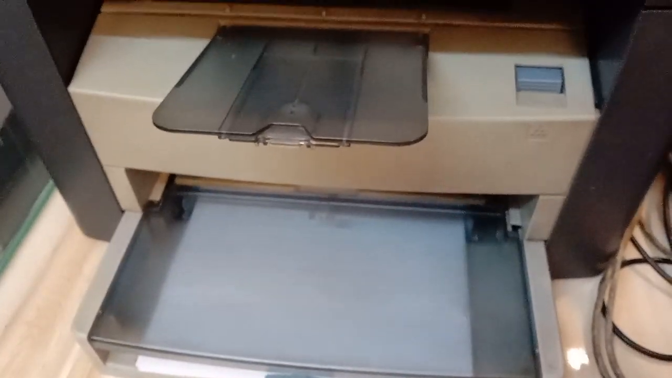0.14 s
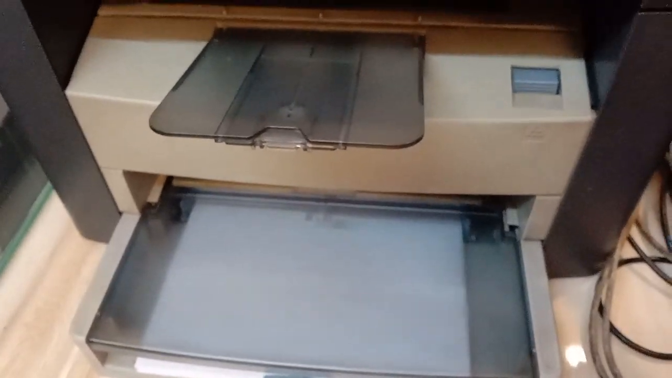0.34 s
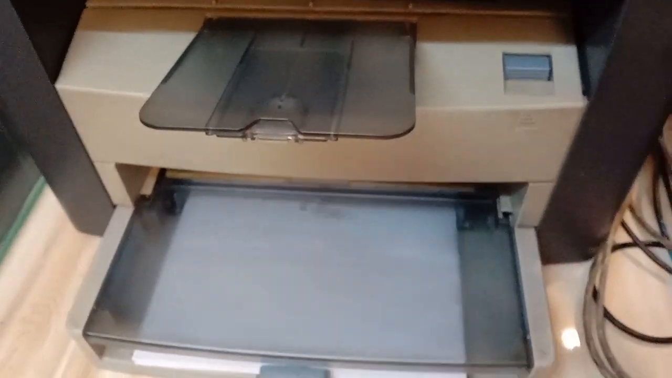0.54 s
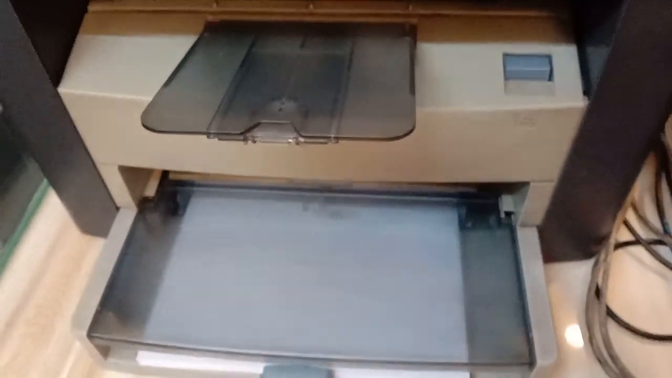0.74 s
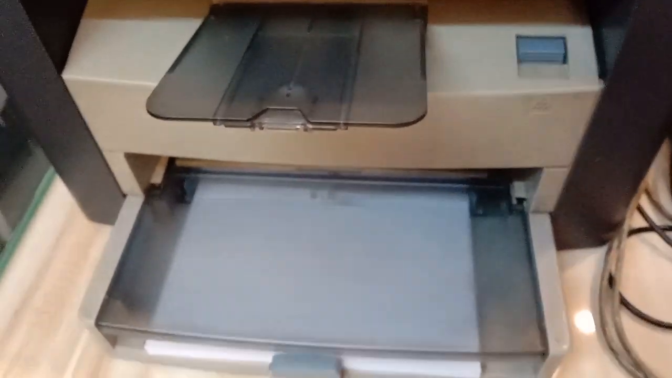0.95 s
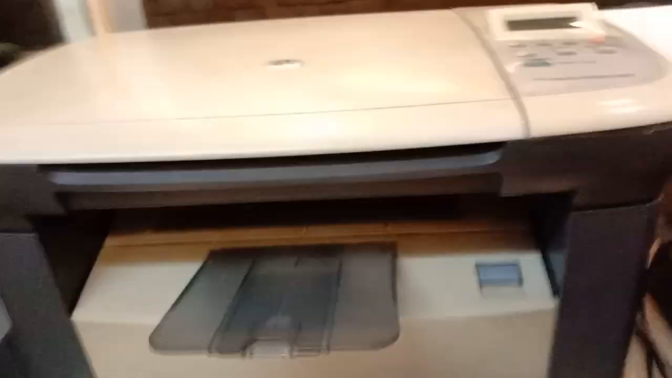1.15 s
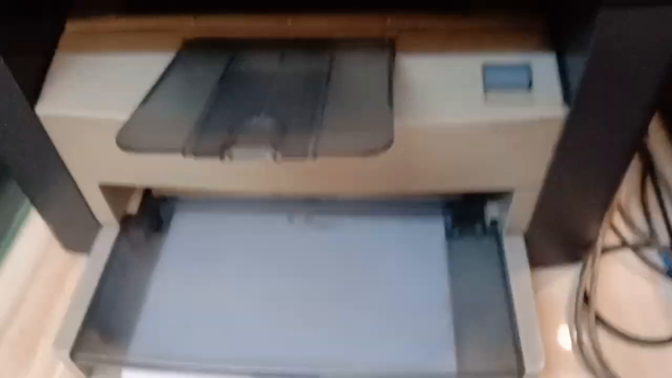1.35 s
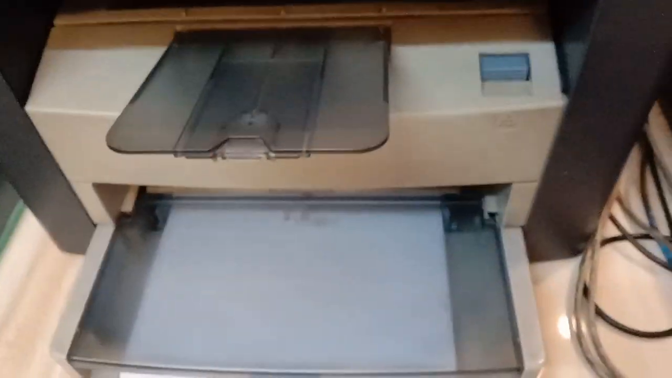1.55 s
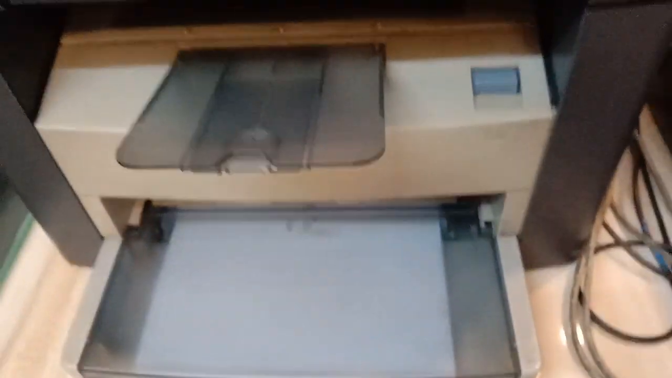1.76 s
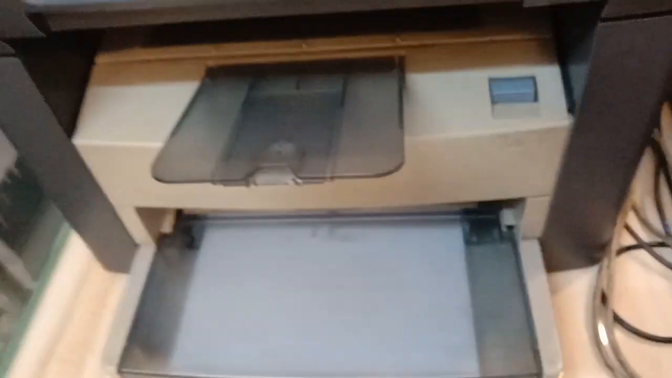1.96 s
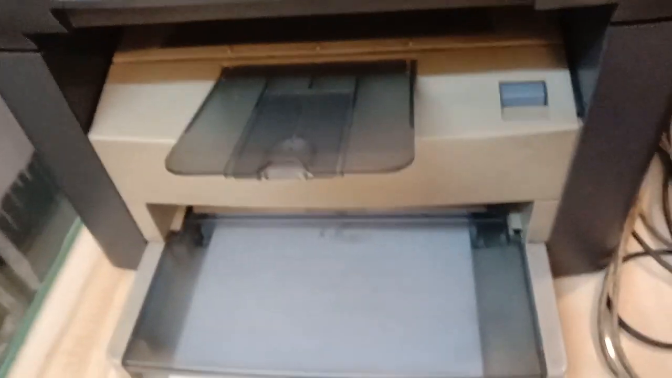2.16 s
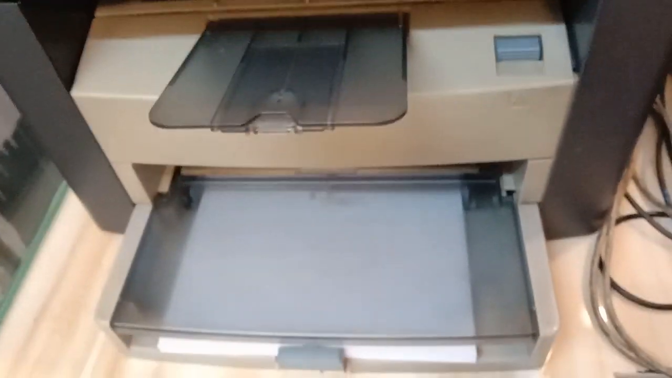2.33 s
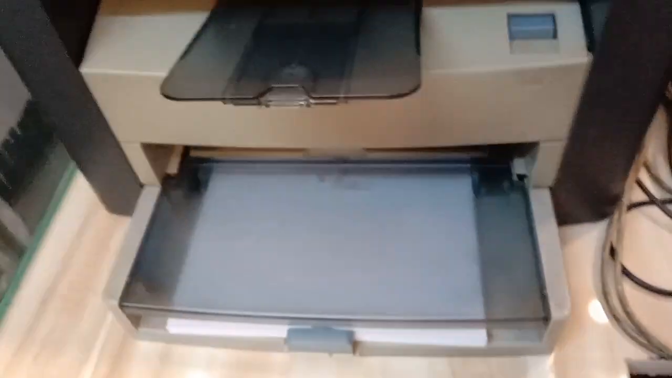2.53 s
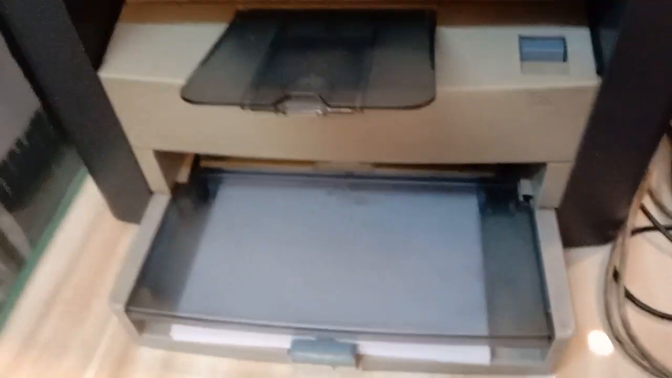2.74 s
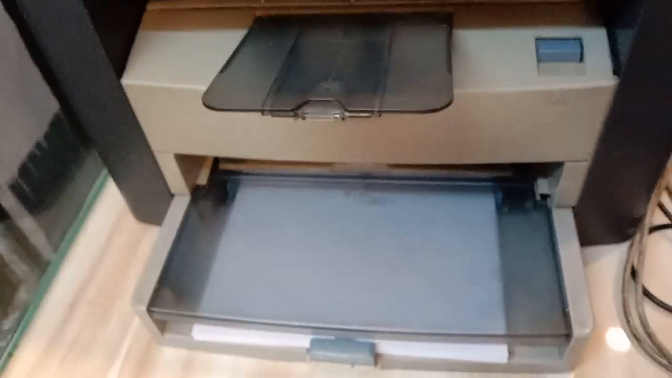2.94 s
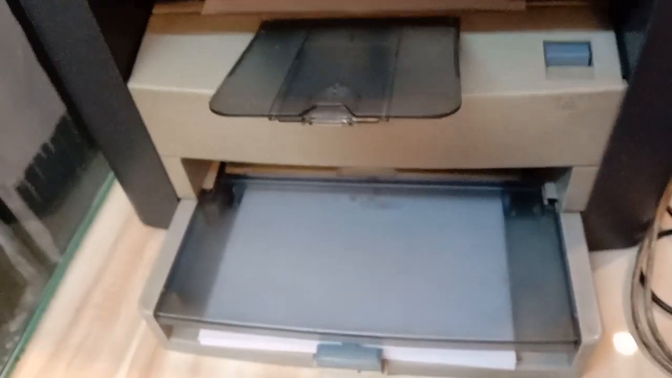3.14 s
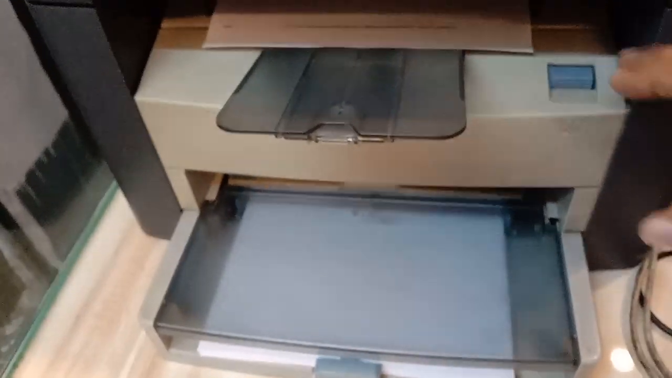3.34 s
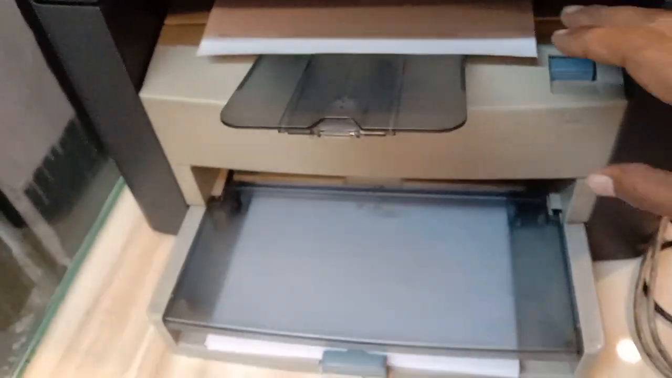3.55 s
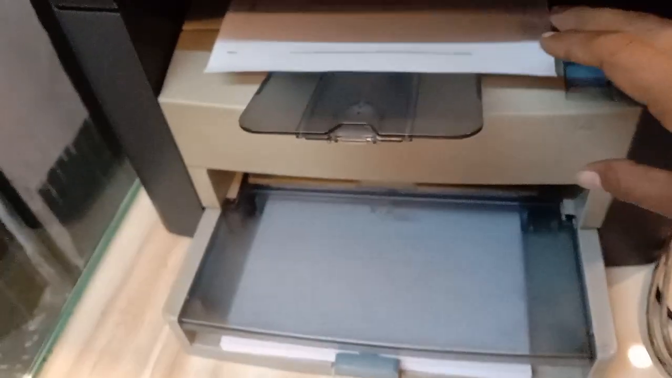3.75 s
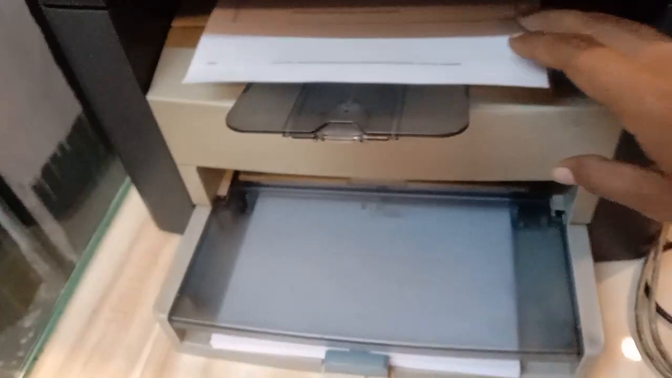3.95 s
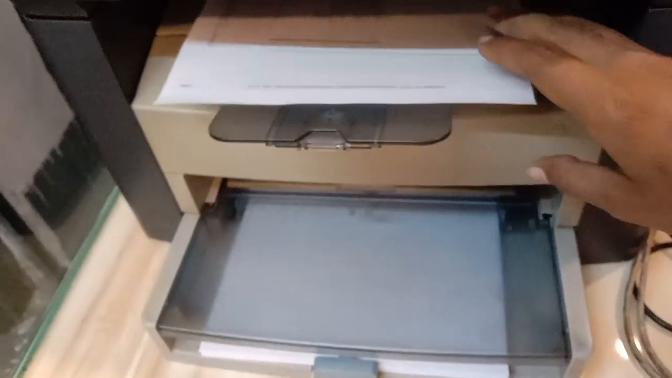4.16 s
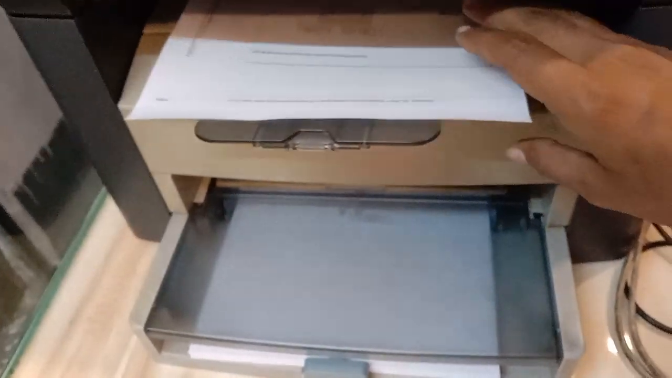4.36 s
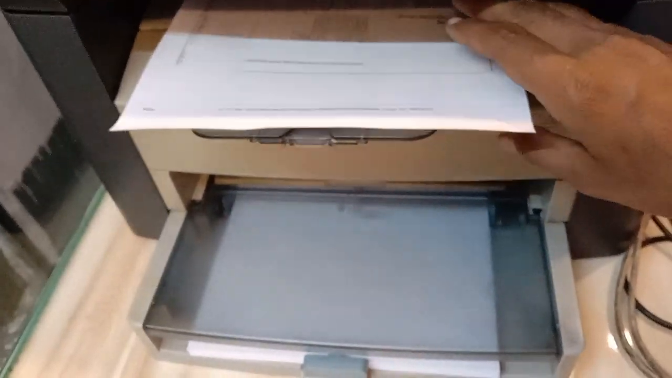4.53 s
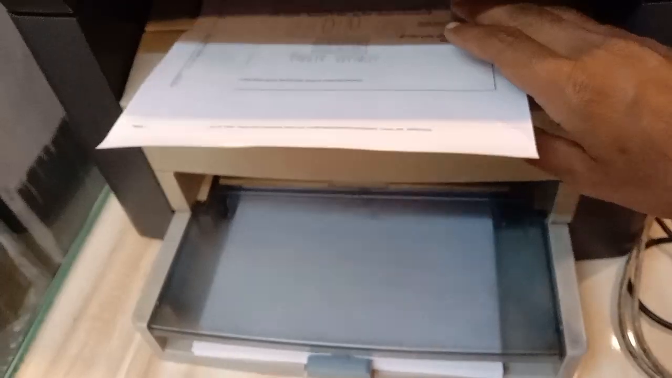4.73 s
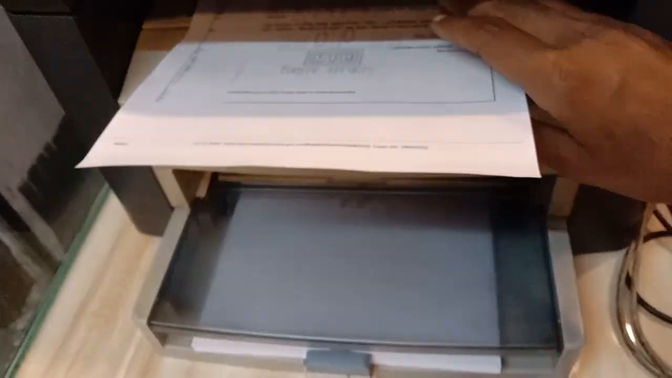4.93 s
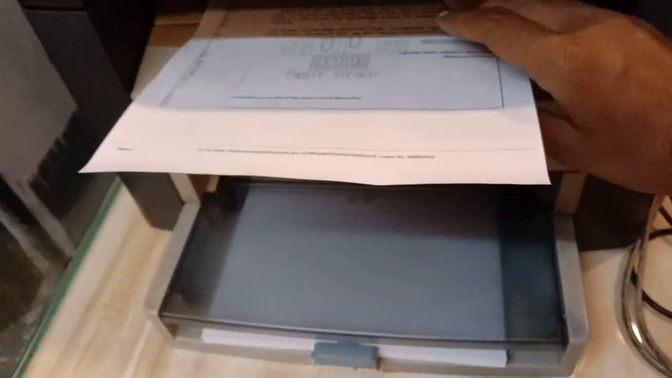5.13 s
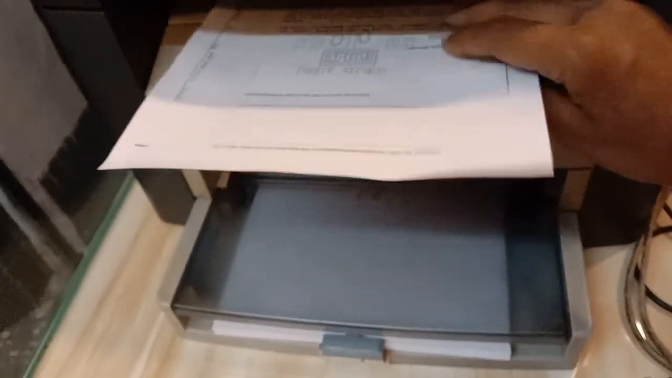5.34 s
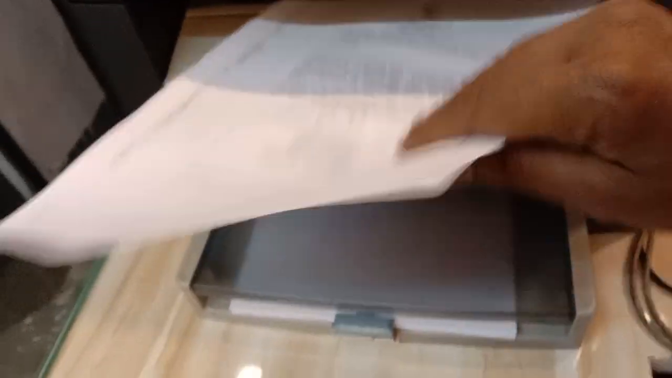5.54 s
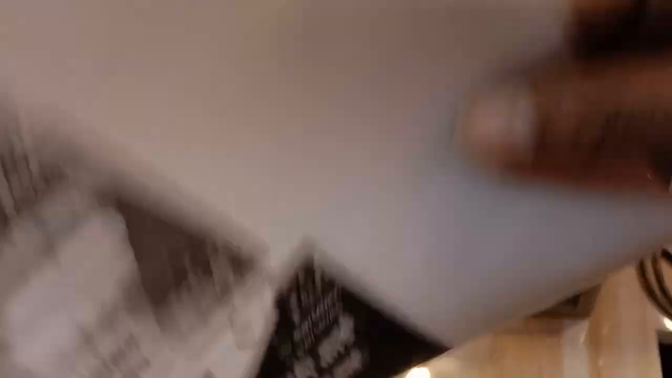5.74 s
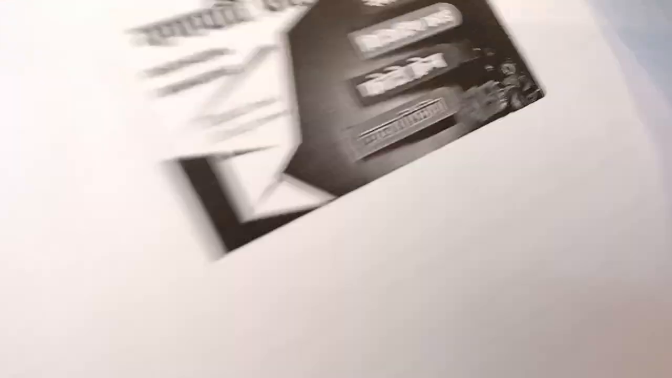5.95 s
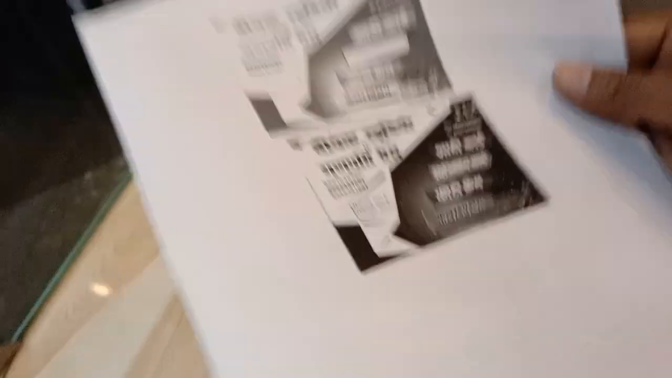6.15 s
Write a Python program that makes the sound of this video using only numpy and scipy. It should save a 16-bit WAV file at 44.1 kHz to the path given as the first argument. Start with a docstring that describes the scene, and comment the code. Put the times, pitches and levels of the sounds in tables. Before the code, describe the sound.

A desktop laser printer runs with a steady hum, a low rumble and a higher gear whine. Early on, two hollow plastic knocks and a sharp latch snap stand out. Paper scrapes and hisses through the rollers amid scattered clicks. The whine stops, the motor keeps humming, and the sheet crinkles as it is lifted away. The sound is heard indoors, just above the paper tray.

```python
"""Just above the paper tray of a desktop laser printer, as it copies one page.
The case rumbles, the main motor hums and the spinning scanner mirror sings; the teeth of a feed gear
whine until the page is out. Paper scrapes and hisses as it sticks and slips through the rollers.
A latch snaps, plastic parts knock and tick, and a hand lifts the crinkling sheet away."""
import sys
import numpy as np
from scipy import signal
from scipy.fft import rfft, irfft
from scipy.io import wavfile

SR = 44100
rng = np.random.default_rng(int(sys.argv[2]) if len(sys.argv) > 2 else 0)


def put_to_file(sound):
    """Save the sound as 16-bit audio at rate SR, in the file named by the first command-line argument."""
    columns = np.atleast_2d(sound).T  # one column per channel
    safe = np.clip(columns, -1, 1)
    whole_steps = np.round(safe * 32767)
    wavfile.write(sys.argv[1], SR, whole_steps.astype(np.int16))


N = 277389
TIME = np.arange(N) / SR

# tone colour of a dull knock or flap: f/Hz, level/dB
KNOCK_COLOUR = [(100, -28), (200, -7), (400, 0), (640, -7), (760, -5), (840, 4.5), (940, 0), (1100, 0.5),
                (1270, 7.5), (1500, -18.5), (3000, -69)]
# tone colour of a sharp paper tick: f/Hz, level/dB
PAPER_TICK_COLOUR = [(1200, -15), (2400, -4.5), (3000, -11), (3700, 4), (4600, -11), (5750, 2.5), (6350, 0),
                     (6950, -2), (8200, -13), (10900, -13.5), (13000, -28), (15000, -11)]
# tone colour of the paper edge's fine sizzle: f/Hz, level/dB
SIZZLE_COLOUR = [(3000, -26), (6500, -11), (8300, -2.5), (9500, 5.5), (10300, 0.5), (11000, 1.5),
                 (12200, -4), (13700, -5), (14500, -3), (15200, 1), (16000, 0)]


def undb(db):
    """Turn decibels into a gain to multiply by."""
    return 10 ** (np.asarray(db) / 20)


def unit(x):
    """Scale a signal to an average power of 1."""
    return x / np.sqrt(np.mean(x ** 2) + 1e-20)


def gain_curve(points):
    """Join (t/s, level/dB) points into one gain per sample."""
    times, dbs = np.transpose(points)
    return undb(np.interp(TIME, times, dbs))


def walk(rate):
    """A smooth random wobble of size 1 that changes about rate times a second."""
    f = np.arange(N // 2 + 1) * SR / N
    return unit(irfft(rfft(rng.standard_normal(N)) / (1 + (f / rate) ** 4), N))


def colour(x, points):
    """Filter a sound through (f/Hz, level/dB) points; white noise keeps its power."""
    size = 2048
    hz, db = np.transpose(points)
    f = np.maximum(np.arange(size // 2 + 1) * SR / size, 1)
    curve = undb(np.interp(np.log(f), np.log(hz), db))
    # folding the cepstrum makes the filter ring after a hit, never before it
    cepstrum = irfft(np.log(curve))
    cepstrum[1:size // 2] *= 2
    cepstrum[size // 2 + 1:] = 0
    response = irfft(np.exp(rfft(cepstrum)))
    return signal.fftconvolve(x, response / np.linalg.norm(response))[:N]


def grains(rate, spread_db):
    """Tiny clicks of uneven size, about rate of them a second."""
    size = undb(spread_db * np.minimum(rng.exponential(size=N), 4))
    return unit(rng.standard_normal(N) * size * (rng.random(N) < rate / SR))


def angle(hz, wobble):
    """The phase of something that turns or vibrates at a slightly unsteady speed."""
    return 2 * np.pi * np.cumsum(hz * (1 + wobble * walk(5.17))) / SR


def tone(phase):
    """A sine wave of power 1 that starts anywhere in its cycle."""
    return np.sqrt(2) * np.sin(phase + rng.uniform(0, 2 * np.pi))


def blows(times, dbs, t60, tail_db, tail_t60):
    """Each blow is a short rattle with a longer, weaker shudder; t60 is the time to fade by 60 dB."""
    envelope, t = np.zeros(N), TIME[:SR // 3]
    shape = undb(-60 * t / t60) + undb(tail_db - 60 * t / tail_t60)
    for start, db in zip(times, dbs):
        i = int(start * SR)
        envelope[i:i + len(t)] += undb(db) * shape[:N - i]
    return envelope * rng.standard_normal(N)


def swell(start, length):
    """A push that builds quickly and dies away."""
    age = np.maximum(TIME - start, 0) / (length / 2)
    return age * np.exp((1 - age ** 2) / 2)


def rub(start, length, attack_s=0.085, release_s=0.074):
    """A contact builds, holds and lets go."""
    rise = np.clip((TIME - start) / attack_s, 0, 1)
    return rise * np.exp(-np.maximum(TIME - start - length, 0) / release_s)


def leaving(start=5.93, db_per_s=17):
    """The fade of the high sounds as the listener turns away with the sheet."""
    return undb(-db_per_s * np.maximum(TIME - start, 0))


def friction():
    """Gains of scrape, hiss and sizzle: each rub of the page adds to that of the turning rollers."""
    # the rollers' constant rubbing: scrape/dB, hiss/dB, sizzle/dB
    idle = (-63.5, -66, -76)
    # the page passes one part after another: t/s, length/s, scrape/dB, hiss/dB, sizzle/dB
    rubs = [(-0.1, 0.53, -54, -57, -71.5), (0.896, 0.25, -59, -62, -62), (1.146, 0.23, -55.5, -66, -75),
            (1.467, .13, -51, -70, -63.5), (1.633, 0.44, -45, -80, -72), (2.091, 0.61, -45.5, -69, -71),
            (2.457, 0.42, -54, -63, -68), (2.736, 0.36, -58.5, -51.5, -68.5),
            (3.235, .39, -63, -57.5, -60.5), (3.623, 0.59, -66, -59, -68.5),
            (4.278, 0.34, -65.5, -57.5, -66), (4.88, 0.22, -64.5, -68.5, -77),
            (5.425, 0.53, -84, -61.5, -67.5)]
    page_power = sum((undb(dbs)[:, None] * rub(t, length)) ** 2 for t, length, *dbs in rubs)
    return np.sqrt(undb(idle)[:, None] ** 2 + page_power) * leaving()


def echoes(x, echo_db, count=9):
    """Shelf, desk and tray reflect the sound; the paths shift as the listener sways."""
    out, index = x.copy(), np.arange(N)
    fine = signal.resample_poly(x, 4, 1)
    for delay_s in np.geomspace(.0009, .011, count):
        path_s = delay_s * rng.uniform(.85, 1.1) + .00009 * walk(1.23)
        echo = np.interp(index - path_s * SR, np.arange(len(fine)) / 4, fine)
        out += undb(echo_db) * rng.choice([-1, 1]) * echo
    return out / np.sqrt(1 + count * undb(echo_db) ** 2)


def housing():
    """Rollers rumble in the plastic case under an airy whirr; thumps make its lowest note boom."""
    # soft thumps of the rollers against the case: t/s, length/s, level/dB
    roller_thumps = [(0.054, 0.066, -50.5), (0.31, 0.2, -46.5), (0.817, 0.12, -51), (0.985, 0.059, -51.5),
                     (1.165, 0.093, -49), (1.537, 0.071, -51), (1.708, 0.18, -52), (1.92, 0.056, -48.5),
                     (2.066, 0.042, -47), (2.35, 0.16, -50.5), (3.093, 0.098, -55.5), (3.8, 0.047, -53),
                     (4.466, .08, -56), (4.826, 0.045, -54), (5.063, 0.12, -50), (5.67, 0.16, -48)]
    # tone colour of the rumbling case: f/Hz, level/dB
    rumble_colour = [(25, -44), (60, -21), (87, -17), (105, -7.5), (145, -5), (215, -4.5), (260, 2),
                     (320, -8), (420, -3.5), (580, -1), (680, -13.5), (1100, -19), (1600, -56.5)]
    # tone colour of the whirring mechanism: f/Hz, level/dB
    whirr_colour = [(500, -9), (700, 2.5), (900, 2.5), (1000, 7), (1130, 3.5), (1270, 17), (1500, -20),
                    (2050, -17), (2600, -33), (3100, -4.5), (4400, -14.5), (5400, -9), (8500, -14),
                    (15500, -20)]
    thumps = sum(undb(db) * swell(t, length) for t, length, db in roller_thumps)
    shake = undb(-56) + undb(-5) * thumps  # part of each thump spreads through the case
    low_note = unit((1 + walk(25)) * tone(angle(216, wobble=.07)))
    boom = (undb(-63.5) + thumps) * low_note
    rumble = colour(rng.standard_normal(N), rumble_colour) * shake * undb(2.9 * walk(21))
    whirr = colour(rng.standard_normal(N), whirr_colour) * undb(-60.5 + walk(4.1))
    return rumble + boom + whirr


def scanner(mirror_hz=505.1):
    """The spinning mirror sings in thin overtones that waver as the listener sways."""
    # the mirror's overtones: multiple of the turning rate, level/dB
    overtones = [(4, 0), (6, -5), (10, -4)]
    # boost of the lowest overtone: t/s, level/dB
    low_boost = [(0, 8.5), (2.7, 3), (3.1, -11), (4.5, 0), (5.1, 5.5), (5.7, -3)]
    spin = angle(mirror_hz, wobble=.0001)
    low, *upper = [undb(-69 + db + 2 * walk(2.4)) * tone(k * spin) for k, db in overtones]
    return (low * gain_curve(low_boost) + sum(upper)) * leaving()


def motor(shaft_hz=83.68, roller_turn_s=.752):
    """The main motor hums and throbs; its fifth harmonic swells once per turn of a roller."""
    # the hum's overtones: multiple of the turning rate, level/dB
    overtones = [(6, 0.5), (7, -31), (12, -37), (18, -34.5)]
    # how loud the hum is at the listener: t/s, level/dB
    hum_level = [(0.0, -41), (0.24, -38.5), (0.73, -42), (1.96, -39), (3.33, -42), (3.43, -39), (5.66, -39),
                 (5.85, -47), (5.88, -42), (6.29, -42.5)]
    shaft = angle(shaft_hz, wobble=0.00068)
    hum = sum(undb(db + 0.69 * walk(40)) * tone(k * shaft) for k, db in overtones)
    roller = np.cos(2 * np.pi * (TIME - .48) / roller_turn_s)
    fifth = undb(-60.5 + 7 * roller + 2 * walk(12)) * tone(5 * shaft + .5 * walk(10))
    throb = undb(-65 + 4 * walk(10)) * tone(angle(87, wobble=.04))
    return hum * gain_curve(hum_level) * undb(0.84 * walk(3.7)) + fifth + throb


def feed_gear(tooth_hz=1225.5, stop_s=4.802, ease_s=0.2, sag_db_per_s=.5):
    """Gear teeth whine, louder as the page drags; uneven teeth shake the level and rattle a panel."""
    # faint steady whines: f/Hz, level/dB; the first is an overtone of the motor's 502 Hz fan tone
    steady_whines = [(1507, -67), (2132, -76.5), (4518, -80), (5517, -90), (6910, -79.5)]
    # tone colour of the rattling panel: f/Hz, level/dB
    panel_colour = [(900, -52), (1150, -15.5), (1230, -25), (1265, 16.5), (1330, -25.5), (1600, -49.5)]
    scrape = friction()[0]
    load = scrape / scrape.max()
    easing = np.clip(1 - (stop_s - TIME) / ease_s, 0, 1)  # quieter just before it stops
    main_gain = undb(-43 + 3.5 * load - sag_db_per_s * TIME - 4.5 * easing)
    third_gain = undb(-83) + undb(-59) * load
    teeth = angle(tooth_hz, wobble=.0005) + .1 * walk(40)
    shake = undb(-.5 + 1.6 * walk(30))
    rattle = colour(grains(rate=400, spread_db=0), panel_colour)
    whine = main_gain * (shake * tone(teeth) + undb(-12.5) * rattle)
    third_harmonic = undb(2 * walk(6.1)) * third_gain * tone(3 * teeth)
    faint = sum(undb(db + 3 * walk(4)) * tone(angle(hz, wobble=.0006)) for hz, db in steady_whines)
    running = np.clip((stop_s - TIME) / .003, 0, 1)
    return (whine + third_harmonic + faint) * running


def tray(note_hz=853, t60=0.05):
    """Picking up the page knocks the hollow tray, which rings briefly on one note."""
    # knocks on the tray: t/s, level/dB
    rings = [(.283, -30.5), (.413, -31)]
    out = 0
    for start, db in rings:
        age = np.maximum(TIME - start, 0)
        out += undb(db - 60 * age / t60) * np.sin(2 * np.pi * note_hz * age)
    return out


def clatter():
    """Plastic parts give dull knocks and paper edges give bright ticks."""
    # knocks of rollers and levers: t/s, body/dB, treble/dB
    knocks = [(0.285, -33, -42.5), (0.412, -21, -31), (0.523, -49, -44), (1.208, -63, -43),
              (1.849, -40, -35), (1.939, -46, -40), (2.287, -49, -31.5), (2.412, -40.5, -40),
              (2.508, -47, -32.5), (2.594, -62, -38), (2.659, -46, -38.5), (3.178, -42, -44),
              (3.198, -39, -41.5), (3.841, -52, -41), (4.061, -65, -43.5), (4.501, -47, -45),
              (4.593, -62, -55), (6.192, -51, -45)]
    # tone colour of a knock's treble: f/Hz, level/dB
    treble_colour = [(900, -26), (1500, 19), (2500, 16), (3600, 12.5), (4700, 0.5), (5600, -3.5),
                     (8000, -8.5), (15000, -39)]
    # ticks of paper edges and flaps: t/s, tick/dB, sparkle/dB
    ticks = [(1.1298, -61, -43.5), (1.1787, -67, -47), (2.285, -77, -50), (2.5114, -50, -52),
             (2.549, -59, -46), (2.594, -64, -46), (2.9397, -48, -52), (3.6058, -26.5, -30),
             (5.123, -33, -41)]
    times, body_db, treble_db = np.transpose(knocks)
    body = colour(blows(times, body_db, t60=0.05, tail_db=-10, tail_t60=0.3), KNOCK_COLOUR)
    treble = colour(blows(times, treble_db, t60=0.035, tail_db=-13.5, tail_t60=0.58), treble_colour)
    times, tick_db, sparkle_db = np.transpose(ticks)
    tick = colour(blows(times, tick_db, t60=0.042, tail_db=-14, tail_t60=0.3), PAPER_TICK_COLOUR)
    sparkle = colour(blows(times, sparkle_db, t60=0.022, tail_db=-24, tail_t60=.1), SIZZLE_COLOUR)
    return undb(-2.5) * (body + treble) + undb(-3) * tick + sparkle


def latch(snap_s=1.0892):
    """A latch snaps home in a few very quick hits and rings its panel."""
    # the hits: delay/s, relative force
    hits = [(0, -0.29), (.0004, 0.6), (.00095, -1), (.0016, -0.18)]
    # ringing notes of latch and panel: f/Hz, level/dB, time to fade by 60 dB/s
    notes = [(676, -16.5, 0.023), (900, -7, 0.0095), (1290, -11, 0.038), (1380, -16, 0.023),
             (1660, 2, 0.0073), (2320, -8, 0.0046), (3710, -12, 0.012), (5400, -18, 0.0056),
             (6960, -18, 0.0049), (9400, -12.5, 0.0016), (10900, -25, 0.0025), (14900, -15, .003)]
    out, t = np.zeros(N), TIME[:SR // 8]
    ring = sum(undb(db - 60 * t / t60) * np.sin(2 * np.pi * hz * t) for hz, db, t60 in notes)
    for delay, force in hits:
        i = int((snap_s + delay) * SR)
        out[i:i + len(t)] += force * ring
    bass_cut = signal.butter(1, 220, "high", fs=SR, output="sos")  # a small panel gives little bass
    return undb(-3) * signal.sosfilt(bass_cut, out)


def crinkling_sheet():
    """The page buckles in bursts of tiny creases and flaps as it is lifted."""
    # the sheet buckles: t/s, length/s, level/dB, bright share/dB
    buckles = [(2.825, 0.04, -35, -13.5), (4.82, 0.021, -42, -14.5), (4.836, 0.021, -37, -25),
               (4.909, 0.03, -53, -18), (5.109, 0.033, -43, 1.5), (5.136, 0.039, -48, -6),
               (5.657, 0.055, -47, -11), (5.861, 0.042, -38.5, -35)]
    # tone colour of the duller creases: f/Hz, level/dB
    crease_colour = [(200, -6), (700, -20), (1200, -6.5), (1750, 2), (2300, -0.5), (3200, -1.5),
                     (4000, -16.5), (5000, -16.5), (12000, -71)]
    # the lifted sheet bends: t/s, length/s, level/dB
    bends = [(5.14, 0.056, -50), (5.644, 0.09, -46.5), (5.76, 0.095, -49), (5.866, 0.045, -36.5),
             (5.923, 0.033, -47.5), (6.171, 0.035, -45.5)]
    creases = grains(rate=1500, spread_db=1.5)
    crackle = grains(rate=3500, spread_db=1.5)
    dull = sum(undb(db) * swell(t, length) for t, length, db, _ in buckles)
    bright = sum(undb(db + share) * swell(t, length) for t, length, db, share in buckles)
    bending = sum(undb(db) * swell(t, length) for t, length, db in bends)
    crinkle = colour(creases * dull, crease_colour) + colour(crackle * bright, PAPER_TICK_COLOUR)
    return crinkle + colour(bending * rng.standard_normal(N), KNOCK_COLOUR)


def swish(rest_hz=5250, settle_s=0.12):
    """The page's edge rubs along a guide with a ragged hiss that settles in pitch."""
    # the swishes: t/s, length/s, starting f/Hz, level/dB
    strokes = [(-0.05, 0.16, 4570, -56.5), (1.493, 0.06, 5680, -52), (2.525, 1, 9740, -61.5)]
    out = 0
    for start, length, hz, db in strokes:
        age = np.maximum(TIME - start, 0)
        centre_hz = rest_hz + (hz - rest_hz) * np.exp(-age / settle_s)
        band = unit((walk(450) + walk(1300)) * tone(angle(centre_hz, wobble=.03)))
        out += undb(db) * rub(start, length) * band
    return out * undb(2 * walk(35))


def scuffs():
    """The moving page catches and makes the paper path ring with brief, hollow rubs."""
    out = 0
    for hz in (1850, 2540, 3233, 3945):
        catch = undb(4 * np.minimum(walk(12), 1.8))
        out += catch * walk(170) * tone(angle(hz, wobble=.025))
    return unit(out)


def sliding_paper():
    """The sheet sticks and slips along guides and rollers."""
    # tone colour of paper scraping the guides: f/Hz, level/dB
    scrape_colour = [(500, -3.5), (800, -7), (1100, 4), (1270, 11), (1450, 6.5), (2100, 8), (2800, 6.5),
                     (3700, -5.5), (4400, -19), (8000, -27.5)]
    # tone colour of paper hissing on the rollers: f/Hz, level/dB
    hiss_colour = [(2000, -19.5), (3200, 6.5), (4000, -3), (4500, -1.5), (5100, 5), (5700, 4.5), (6350, -9),
                   (7200, 1.5), (8100, -13.5), (9400, -10.5), (13000, -32.5)]
    scrape, hiss, sizzle = friction()
    drag = undb(1.75 * walk(24))
    scraping = undb(-1.5) * scrape * colour(grains(rate=4500, spread_db=1.6) * drag, scrape_colour)
    hissing = undb(.5) * hiss * colour(grains(rate=12000, spread_db=-2.0) * drag, hiss_colour)
    # a thin, wavering tone near 15 kHz that grows with the sizzle
    thin_tone = sizzle / sizzle.max() * unit(walk(600) * tone(angle(15000, wobble=.005)))
    sizzling = sizzle * (colour(grains(rate=20000, spread_db=1), SIZZLE_COLOUR) + thin_tone)
    scuffing = undb(-2.5) * np.sqrt(scrape * hiss) * scuffs()
    return scraping + hissing + sizzling + scuffing


def scene():
    """The machine is heard directly; paper and clatter also bounce off nearby surfaces."""
    inside = echoes(sliding_paper() + swish(), echo_db=-8)
    in_front = echoes(clatter() + crinkling_sheet(), echo_db=-15)
    machine = motor() + scanner() + feed_gear() + housing() + latch() + tray()
    return (machine + inside + in_front)[None]


def record(dry, low_hz=50, top_hz=15750):
    """Round off the loudest peak, then cut the deep bass and the highest treble."""
    bass_cut = signal.butter(2, low_hz, "high", fs=SR, output="sos")
    treble_cut = signal.ellip(10, .2, 80, top_hz, fs=SR, output="sos")
    thinned = signal.sosfilt(bass_cut, np.tanh(dry))
    return signal.sosfilt(treble_cut, thinned)


dry = scene()
out = record(dry)
put_to_file(out)
```